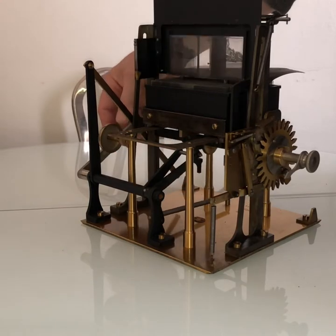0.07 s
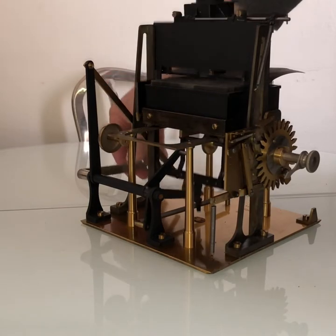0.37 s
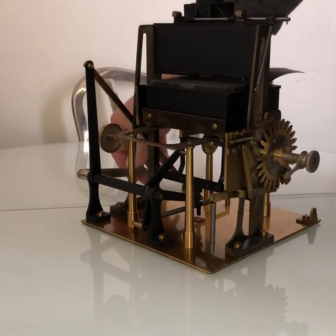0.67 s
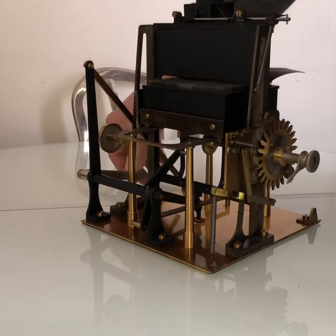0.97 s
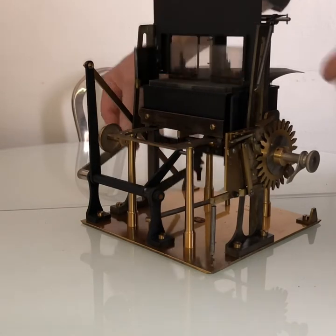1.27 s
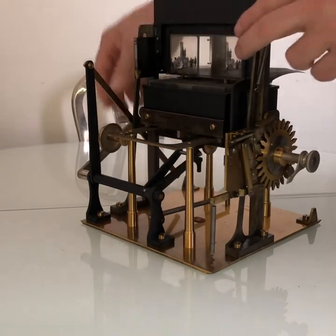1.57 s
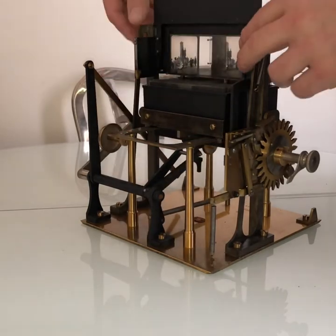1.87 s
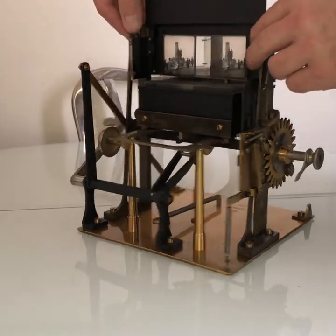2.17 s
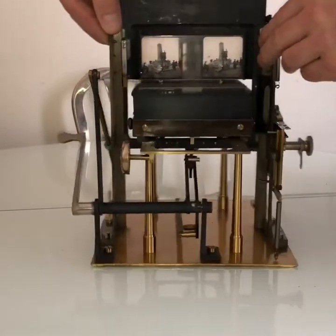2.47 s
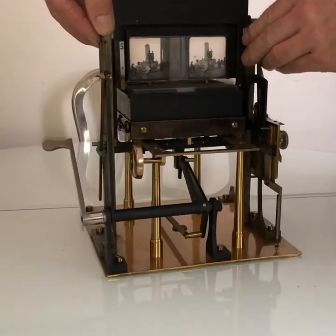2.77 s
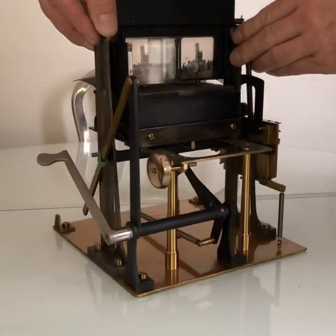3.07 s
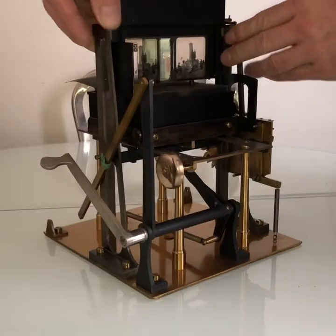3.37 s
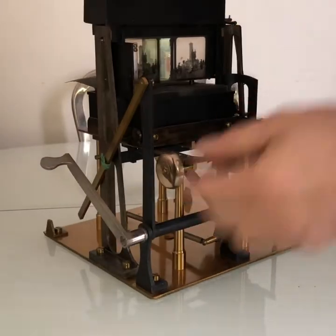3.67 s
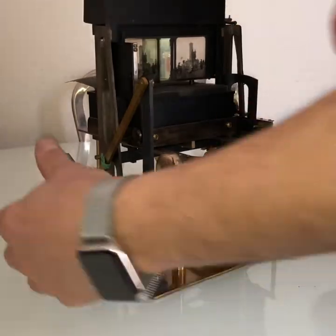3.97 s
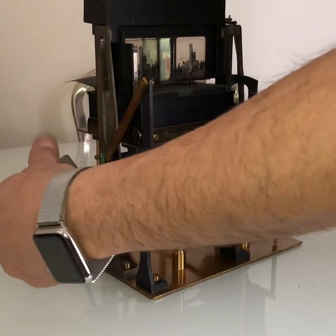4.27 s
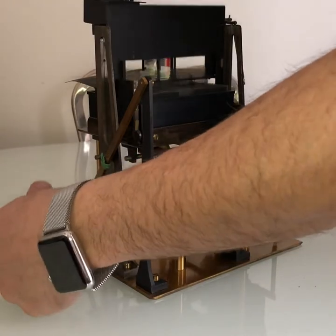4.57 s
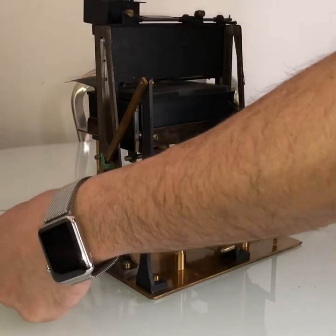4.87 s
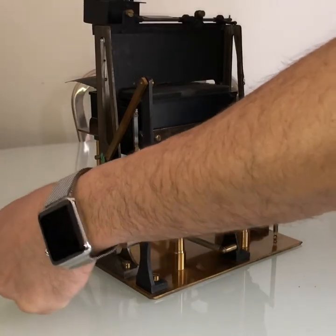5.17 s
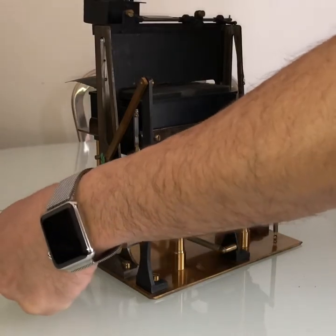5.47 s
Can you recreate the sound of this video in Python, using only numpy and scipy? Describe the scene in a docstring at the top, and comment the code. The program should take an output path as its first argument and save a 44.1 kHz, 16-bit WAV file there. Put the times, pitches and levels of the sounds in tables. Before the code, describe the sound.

In a small, hard room, a lever lifts and drops glass slides in an antique brass viewer. Sharp, bright clicks and little rattles come with metallic knocks and soft thumps through the table. Midway the base scrapes briefly as it is turned, and loose parts clack. After a lull, the mechanism clicks again and ends on a loud clatter. It is heard from nearby, over a faint appliance hum.

```python
"""Brass slide viewer on a glass table

In a small, hard room an appliance hums faintly while a lever lifts and drops glass slides.
Impacts excite damped modes: catches click, the carriage knocks and the table thumps under it.
Friction drives resonances: midway the antique viewer is turned, scraping on its base plate."""
import sys
import numpy as np
from scipy import signal
from scipy.fft import rfft, irfft
from scipy.io import wavfile

SR = 44100
rng = np.random.default_rng(int(sys.argv[2]) if len(sys.argv) > 2 else 0)


def master(y):
    """Save y as 16-bit WAV."""
    cut = np.clip(np.atleast_2d(y).T, -1, 1)
    pcm = np.round(cut * 32767)  # scale
    wavfile.write(sys.argv[1], SR, pcm.astype(np.int16))


N = 242991
TIME = np.arange(N) / SR


def from_db(db):
    """Amplitude ratio: a factor of ten per 20 dB."""
    return 10 ** (np.asarray(db) / 20)


def unit_rms(x):
    """Normalisation to unit power."""
    return x / np.sqrt(np.mean(x ** 2) + 1e-20)


def add(track, t, sound):
    """Superposition: the sound joins the track at t seconds."""
    start = max(round(t * SR), 0)
    track[start:start + len(sound)] += sound[:max(len(track) - start, 0)]


def at_hz(points, hz):
    """Interpolation on a logarithmic frequency axis."""
    freqs, values = np.transpose(points)
    return np.interp(np.log(hz + 1), np.log(freqs), values)


def drift(per_s):
    """Random modulation: Gaussian values joined by straight lines."""
    knots = rng.standard_normal(2048)
    return np.interp(TIME * per_s, np.arange(len(knots)), knots)


def decay(t60, size=N):
    """Exponential damping: 60 dB lost in t60 seconds."""
    return np.exp(-np.log(1000) * TIME[:size] / t60)


def strokes(rows, attack_s, t60):
    """Envelope of movements: linear rise, hold, exponential decay."""
    envelope = np.zeros(N)
    for t, length, db in rows:
        rise = np.clip((TIME - t) / attack_s, 0, 1)
        release_db = -60 * np.maximum(TIME - t - length, 0) / t60
        envelope += rise * from_db(db + release_db)
    return envelope


def colour(x, spectrum, tilt=0, size=4096):
    """Minimum-phase filtering at unit power gain; tilt in dB per octave."""
    hz = np.arange(size // 2 + 1) * SR / size
    gain = unit_rms(from_db(at_hz(spectrum, hz) + tilt * np.log2(hz + 1)))
    cepstrum = irfft(np.log(gain))[:size // 2]
    cepstrum[1:] *= 2
    response = irfft(np.exp(rfft(cepstrum, size)))
    return signal.fftconvolve(x, response)[:len(x)]


def ring(hz, t60, size=int(.4 * SR)):
    """Free vibration of one mode: a damped sinusoid."""
    return np.sin(2 * np.pi * hz * TIME[:size]) * decay(t60, size)


def strike(modes, spread_db, tilt=0):
    """Modal superposition: a blow gives each mode its own strength and sign."""
    hz, db, t60 = np.transpose(modes)
    octaves = np.log2(hz) - np.mean(np.log2(hz))
    gains = from_db(db + tilt * octaves + spread_db * rng.standard_normal(len(hz)))
    gains *= rng.choice([-1, 1], len(hz))
    return sum(g * ring(f, t) for g, f, t in zip(gains, hz, t60))


def clash(t60, size=SR // 6, spread_s=0.0013):
    """Modal overlap: a blow spreads through many joined parts and decays as noise."""
    swell = 1 - np.exp(-TIME[:size] / spread_s)
    return rng.standard_normal(size) * decay(t60, size) * swell


def tick(touches, t60=0.0082):
    """Convolution: each light touch sets off a very short clash."""
    return unit_rms(signal.fftconvolve(touches, clash(t60))[:N])


def resonate(force, hz, width_hz):
    """Forced vibration of a two-pole resonator, at unit rms."""
    radius = np.exp(-np.pi * width_hz / SR)
    feedback = [1, -2 * radius * np.cos(2 * np.pi * hz / SR), radius ** 2]
    return unit_rms(signal.lfilter([1, 0, -1], feedback, force))


def slips(per_s, spread_db):
    """Stick-slip friction as a Poisson train of uneven impulses."""
    sizes = from_db(spread_db * np.minimum(rng.exponential(1, N), 4)) * rng.choice([-1, 1], N)
    return unit_rms(sizes * (rng.random(N) < per_s / SR))


# Reverberation time of the room: f/Hz, T60/s
ROOM_DECAY = [(100, 1), (400, 0.3), (1500, 0.33), (4000, 0.28), (7000, 0.23), (11000, 0.14), (16000, 0.26)]

def room(x, size=int(.6 * SR), build_up_s=.007):
    """Reverberation: dense reflections build up, then last longest in the bass."""
    edges = np.geomspace(70, 18000, 15)
    white, tail = rng.standard_normal((2, size)), 0
    for k, (low, high) in enumerate(zip(edges, edges[1:])):
        band = signal.sosfilt(signal.butter(2, [low, high], "band", fs=SR, output="sos"), white[k % 2])
        tail += band * decay(at_hz(ROOM_DECAY, np.sqrt(low * high)), size)
    build_up = 1 - np.exp(-(TIME[:size] / build_up_s) ** 2)
    return signal.fftconvolve(x, unit_rms(tail * build_up) / np.sqrt(size))[:N]


# Motor tones of the appliance: f/Hz, rms level/dB
HUM_TONES = [(100, -79), (174, -60.5), (187, -61.5), (199, -57), (235, -62), (399, -77), (594, -76.5)]
# Noise spectrum of the still room: f/Hz, relative level/dB
AIR_SPECTRUM = [(15, -53), (25, -15.5), (127, -7), (166, -8), (195, -0.5), (229, -8), (301, -16),
                (405, -15.5), (531, -21), (734, -19.5), (1070, -27), (1560, -25.5), (2910, -33),
                (14800, -48), (16000, -51.5)]

def background(air_db=-56.5):
    """Phase modulation makes the motor tones waver over steady broadband noise."""
    hum = np.zeros(N)
    for hz, db in HUM_TONES:
        phase = 2 * np.pi * hz * TIME + drift(4.9) + rng.uniform(0, 2 * np.pi)
        hum += from_db(db) * np.sqrt(2) * np.sin(phase)
    return hum + from_db(air_db) * colour(rng.standard_normal(N), AIR_SPECTRUM)


# Slides travelling along their guides: t/s, duration/s, level/dB
SLIDE_TRAVELS = [(0.19, 0.025, -50.5), (0.37, 0.23, -58.5), (0.86, 0.35, -53.5), (1.25, 0.053, -57),
                 (1.55, 0.26, -62.5), (2.2, 0.92, -59), (4.42, 0.5, -66), (5.34, 0.061, -54)]
# Spectrum of rubbing: f/Hz, relative level/dB
RUB_SPECTRUM = [(20, -45.5), (200, -7.5), (600, 8), (1100, 5.5), (2000, 6.5), (3500, 3.5), (5000, 2),
                (8000, -1), (12000, -13.5), (16000, -11)]

def guides():
    """Sliding friction: glass rubs unevenly along brass."""
    friction = slips(per_s=2500, spread_db=3) * from_db(2 * drift(35))
    return strokes(SLIDE_TRAVELS, attack_s=0.05, t60=0.73) * colour(friction, RUB_SPECTRUM)


# Modes of the steel spring: f/Hz, level/dB, T60/s
SPRING_MODES = [(2760, -9.5, 0.22), (3476, -7.5, 0.31), (3890, -1.5, 0.043), (4880, -5, 0.18),
                (6700, -8.5, 0.18), (7500, -21, 0.14), (7730, 3.5, 0.06), (8290, -1, 0.1),
                (9700, -11, 0.12), (10500, -14, 0.12), (12650, -34.5, .14)]
# Spells of trembling: t/s, duration/s, level/dB
SPRING_TREMBLES = [(1.54, 0.24, -67), (2.76, 0.089, -51), (4.41, 0.18, -62.5)]

def spring_jingle(width_hz=22, tilt=3.4, tick_db=-6):
    """Random excitation: the loose spring ticks against its hook, favouring its high modes."""
    touches = slips(per_s=80, spread_db=1.5)
    shimmer = sum(from_db(db + tilt * np.log2(hz)) * resonate(touches, hz, width_hz)
                  for hz, db, _ in SPRING_MODES)
    ticks = from_db(tick_db) * colour(tick(touches), CLICK_SPECTRUM, tilt=12)
    return strokes(SPRING_TREMBLES, attack_s=0.047, t60=0.21) * (unit_rms(shimmer) + ticks)


def spring_ring():
    """Free vibration: thin steel rings on after each jolt of a dropping slide."""
    out = np.zeros(N)
    for t, db, _, _, spring_db in drop_contacts():
        add(out, t, from_db(db + spring_db) * strike(SPRING_MODES, spread_db=1.5, tilt=1.5))
    return out


# Modes of the latch: f/Hz, level/dB, T60/s
LATCH_MODES = [(1700, -12, .1), (2700, -11, .14), (3570, -1, .16), (4720, -3, .13), (5500, -9, .12),
               (6200, -11, .1), (6800, -11, .12), (9100, -14, .1)]
# Blows on the latch: t/s, level/dB
LATCH_CLINKS = [(0.188, -52), (0.217, -66), (0.241, -34.5), (2.005, -62.5)]

def latch():
    """Sparse modes give a small struck steel piece a clear pitch."""
    out = np.zeros(N)
    for t, db in LATCH_CLINKS:
        add(out, t, from_db(db) * strike(LATCH_MODES, spread_db=2))
    return out


# Resonances of the base plate on glass: f/Hz, bandwidth/Hz, level/dB before and after the swing
PLATE_MODES = [(132, 23, -6, -5), (467, 51, -11, 1.5), (634, 23, 5.5, -7), (800, 280, 5.5, -20),
               (1098, 27, 1, -8.5), (1502, 46, -12, -3.5), (1687, 56, -5, -5), (1913, 75, 5, -29.5),
               (2780, 80, -19, -9), (3086, 47, -9, -8)]
# Swing onto another edge: t/s, share of the second contact patch
WEIGHT_SHIFT = [(2.34, 0.14), (2.40, 0.91)]
# Hands pushing the base round: t/s, duration/s, level/dB
BASE_PUSHES = [(2.15, 0.38, -41.5), (2.98, 0.19, -57), (3.48, 0.17, -56)]

def base_scrape(plate_db=-6, rub_db=-9, snag_db=-14):
    """Stick-slip drives the plate as grit snags under it; shifting weight rebalances its modes."""
    friction = slips(per_s=2200, spread_db=3) * from_db(1.7 * drift(70))
    snags = tick(slips(per_s=45, spread_db=2.5))
    swung = np.interp(TIME, *np.transpose(WEIGHT_SHIFT))
    effort = strokes(BASE_PUSHES, attack_s=0.094, t60=0.6)
    plate = sum(from_db(before + (after - before) * swung) * resonate(friction, hz, width)
                for hz, width, before, after in PLATE_MODES)
    grit = from_db(rub_db) * colour(friction, RUB_SPECTRUM)
    grit += from_db(snag_db) * colour(snags, CLICK_SPECTRUM, tilt=-4.5)
    return effort * grit, effort * from_db(plate_db) * plate


# Loose parts rattling: t/s, duration/s, level/dB, loss per contact/dB, tilt/(dB/octave), f/Hz
PART_RATTLES = [(0.417, 0.019, -39, 11, -4.5, 3980), (0.849, 0.021, -28.5, 3, -1, 3750),
                (0.888, 0.017, -8, 6.5, 0.5, 10400), (2.908, 0.036, -40, 5.5, -3.5, 4200),
                (3.036, .018, -38, -1, -4, 4270), (3.072, .031, -44, -1, 0, 6800),
                (3.381, 0.016, -24, 5, -1.5, 7500), (5.21, 0.011, -24.5, 0, 0, 6040),
                (5.231, 0.026, -6.5, 3.5, 1, 8120)]

def rattle_contacts(count=4, pitch_spread=.2, jitter=.2):
    """Repeated impact: an uneven run of contacts, each at another spot and so another pitch."""
    contacts = []
    for t, length, db, loss_db, tilt, hz in PART_RATTLES:
        for k, (late, shift) in enumerate(rng.uniform(-1, 1, (count, 2))):
            step = k + jitter * late * (k > 0)
            onset = t + length * step / (count - 1)
            contacts.append((onset, db - loss_db * k, tilt, hz * np.exp(pitch_spread * shift)))
    return contacts


# Slides dropping: t/s, level/dB, tilt/(dB/octave), f/Hz, bounce delay/s,
# bounce level/dB re the drop, spring level/dB re each contact
SLIDE_DROPS = [(1.163, -11.5, 1, 5430, 0.013, -9, -30), (1.414, -18, -0.5, 7320, 0.033, -6, -11),
               (2.553, -26.5, -3.5, 7550, 0.056, -3, -11.5), (2.749, -20.5, -2.5, 4100, .012, -1, -12.5),
               (4.470, -36, -5.5, 8760, .025, -4, -4), (4.763, -17, -2, 7180, 0.026, -12, -30.5),
               (5.244, -11, -0.5, 10600, 0.053, -22, -27.5)]

def drop_contacts():
    """Inelastic rebound: a slide lands, bounces once and lands more softly."""
    return [(t + delay, db + change_db, tilt, hz, spring_db)
            for t, db, tilt, hz, gap, bounce_db, spring_db in SLIDE_DROPS
            for delay, change_db in ((0, 0), (gap, bounce_db))]


# Single clicks of a catch or glass edge: t/s, level/dB, tilt/(dB/octave), f/Hz
CATCH_CLICKS = [(0.102, -43, -7.5, 9100), (0.2668, -23, -1.5, 7150), (0.460, -17, -2, 8040),
                (0.824, -47, -6, 3480), (0.841, -35, -1.5, 4260), (0.883, -11, 4, 4010),
                (1.12, -35.5, -1, 8800), (1.144, -35, -4, 3360), (1.355, -39.5, -2, 6540),
                (1.900, -50.5, -5, 7450), (2.008, -39.5, -7, 2830), (2.142, -38, -8, 4220),
                (2.163, -40, -2, 4120), (2.360, -35.5, -5, 4200), (2.921, -31, -4.5, 4540),
                (3.437, -32, -5, 7300), (3.63, -50, -6, 8000), (4.710, -32.5, -2, 4420),
                (5.207, -38.5, -2.5, 6140)]
# Spectrum of a hard contact: f/Hz, relative level/dB
CLICK_SPECTRUM = [(20, -67.5), (150, -21), (600, -19), (1600, -7), (2600, -3.5), (3400, 2), (4300, 1.5),
                  (6000, 2), (8200, 3.5), (11000, 2), (13500, -2.5), (16000, -10.5)]

def clicks(crack_db=4.5, part_db=-9, glass_db=-21, rebound_db=-11, rebound_s=.006, glass_modes=240):
    """Brief impacts are broadband: each cracks and rings both a small part and the glass slides."""
    cracks, rings, size = np.zeros(N), np.zeros(N), SR // 9
    glass = np.array([ring(f, t60=.09, size=size) for f in rng.uniform(2500, 15500, glass_modes)])
    glass /= np.sqrt(glass_modes / 2)
    for t, db, tilt, hz, *_ in drop_contacts() + rattle_contacts() + list(CATCH_CLICKS):
        crack = clash(t60=0.02, size=size)
        rebounds = np.cumsum(rebound_s * rng.uniform(0.46, 2, size=3))
        for k, delay in enumerate(rebounds):   # loose parts chatter, weaker each time
            add(crack, delay, from_db(rebound_db) / (k + 1) * clash(t60=0.02, size=size))
        cluster_hz = hz * np.exp(.05 * rng.standard_normal(6))
        part = sum((-1) ** k * ring(f, t60=0.037, size=size) for k, f in enumerate(cluster_hz)) / 2
        glass_ring = rng.standard_normal(glass_modes) @ glass
        add(cracks, t, from_db(db + crack_db) * colour(crack, CLICK_SPECTRUM, tilt))
        add(cracks, t, from_db(db + part_db) * part)
        add(rings, t, from_db(db + glass_db) * colour(glass_ring, CLICK_SPECTRUM, tilt))
    return cracks, rings


# Modes of the brass frame: f/Hz, level/dB, T60/s
FRAME_MODES = [(259, -13.5, 0.27), (356, -20.5, 0.22), (424, -13.5, 0.32), (502, -16.5, 0.14),
               (622, -10, 0.46), (714, -8.5, 0.24), (890, -13, 0.3), (1074, 0.5, 0.15), (1216, -17, 0.07),
               (1325, -10, 0.097), (1556, -14, 0.48), (1708, -10, 0.12), (1890, -3.5, .18), (1956, -3, .18),
               (3270, -15, 0.13), (3960, -8, .22), (4380, -9.5, 0.36), (5360, -17, 0.06)]
# Modes of the glass table: f/Hz, level/dB, T60/s
TABLE_MODES = [(66.2, -16.5, 0.77), (80, -5, 0.31), (117, 2.5, 0.22), (127, 5, 0.31), (138, -14, .28),
               (156, -9.5, 0.26), (235, -18, 0.22)]
# Spectrum of a heavy blow: f/Hz, relative level/dB
KNOCK_SPECTRUM = [(20, -57), (70, -38), (200, -13.5), (400, 3.5), (700, -1.5), (1100, -8), (1900, 3.5),
                  (2600, -4), (5000, -6.5), (16000, -44.5)]
# Carriage hitting its stops, base settling: t/s, level/dB, f/Hz, ring level/dB, thump level/dB
CARRIAGE_KNOCKS = [(0.104, -43.5, 1020, -51, -64), (0.463, -29.5, 1708, -25.5, -39),
                   (0.880, -16.5, 1103, -24, -32.5), (1.142, -34.5, 1600, -44, -59),
                   (1.176, -28.5, 1530, -33.5, -45), (1.415, -22, 1130, -26, -40),
                   (2.556, -30.5, 1060, -36, -39), (2.747, -25, 1027, -23.5, -33.5),
                   (3.367, -33, 1046, -29, -45.5), (4.286, -49.5, 1883, -45.5, -64.5),
                   (4.763, -31.5, 1530, -20.5, -45.5), (5.230, -18.5, 1343, -17.5, -37.5),
                   (5.233, -27, 400, -24, -39.5)]

def knocks(part_t60=0.085, neighbour_db=-6, frame_db=-2, frame_db_per_db=1.167, swell_s=0.014):
    """Coupled vibration: a blow rings the struck part and frame; the table responds more slowly."""
    blows, body = np.zeros(N), np.zeros(N)
    for t, db, hz, ring_db, thump_db in CARRIAGE_KNOCKS:
        below, above = hz * (1 + 0.078 * rng.uniform(.5, 2.2, size=2) * [-1, 1])
        neighbours = ring(below, part_t60) - ring(above, part_t60)
        part = ring(hz, part_t60) + from_db(neighbour_db) * neighbours
        thump = strike(TABLE_MODES, spread_db=0.7)
        thump *= 1 - np.exp(-TIME[:len(thump)] / swell_s)
        add(blows, t, from_db(db) * colour(clash(t60=0.057), KNOCK_SPECTRUM))
        frame = from_db(frame_db_per_db * db + frame_db) * strike(FRAME_MODES, spread_db=1)
        add(body, t, from_db(ring_db) * part + frame + from_db(thump_db) * thump)
    return blows, body


def scene(top_room_db=1, below_room_db=1, ringing_room_db=-12):
    """Direct and reverberant fields: slides on top and carriage below reflect by different paths."""
    blows, body = knocks()
    cracks, glass = clicks()
    grit, plate = base_scrape()
    top, below = cracks + guides(), blows + grit
    ringing = body + glass + spring_ring() + latch() + spring_jingle() + plate
    reflections = from_db(top_room_db) * room(top)
    reflections += room(from_db(below_room_db) * below + from_db(ringing_room_db) * ringing)
    return (top + below + ringing + reflections + background())[None]


def record(dry, low_cut_hz=46, high_cut_hz=16000, ceiling=.85):
    """Band limiting and soft saturation: deep bass and top are cut, the highest peaks rounded."""
    thin = signal.sosfilt(signal.butter(3, low_cut_hz, "high", fs=SR, output="sos"), dry)
    rounded = thin / (1 + (thin / ceiling) ** 4) ** .25
    return signal.sosfilt(signal.ellip(12, .1, 95, high_cut_hz, fs=SR, output="sos"), rounded)


dry = scene()
out = record(dry)
master(out)
```